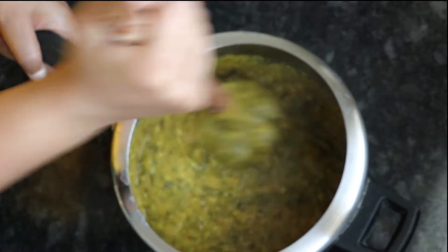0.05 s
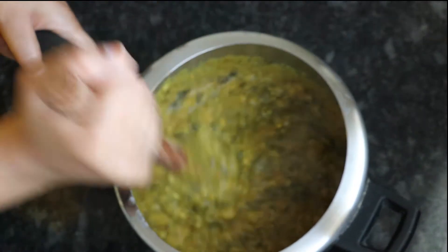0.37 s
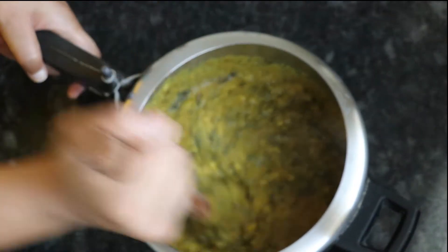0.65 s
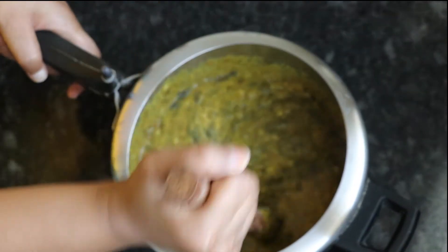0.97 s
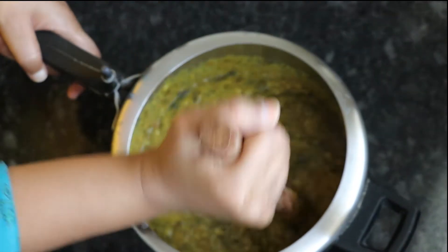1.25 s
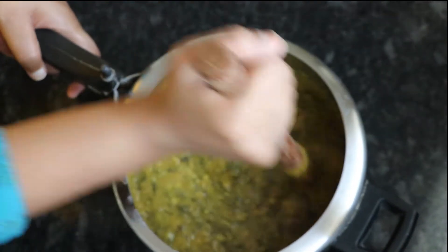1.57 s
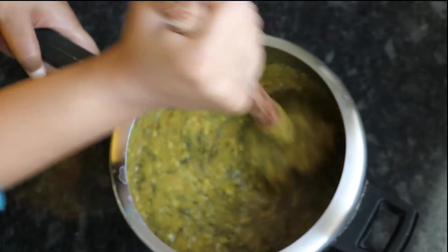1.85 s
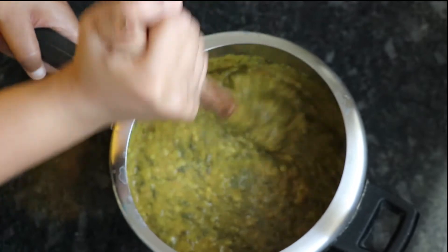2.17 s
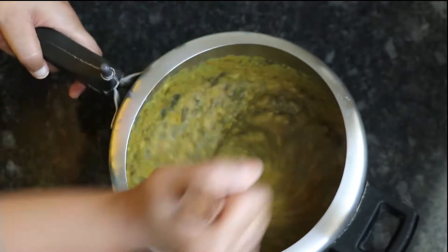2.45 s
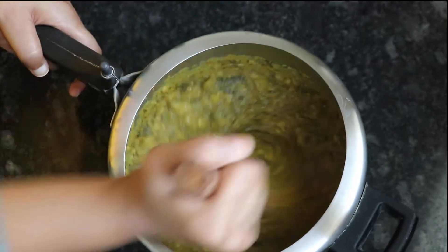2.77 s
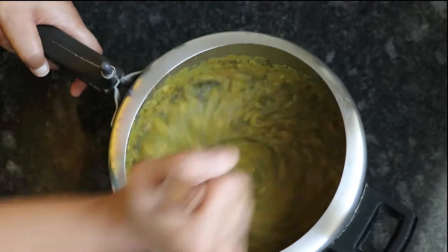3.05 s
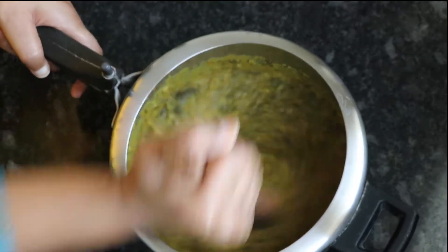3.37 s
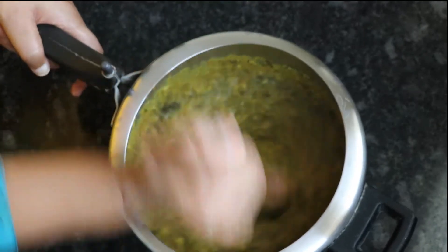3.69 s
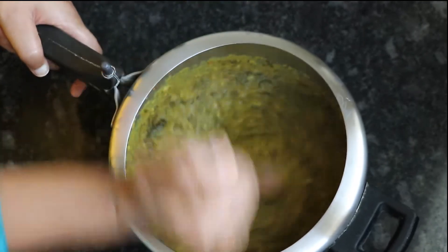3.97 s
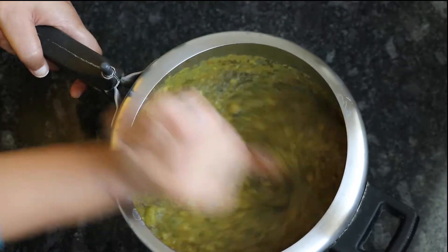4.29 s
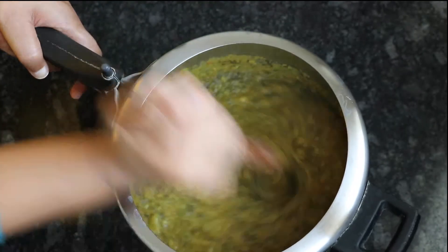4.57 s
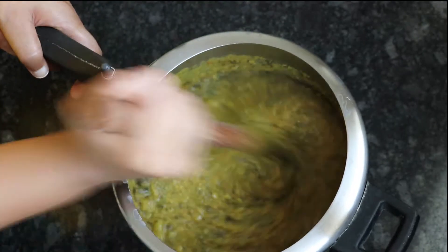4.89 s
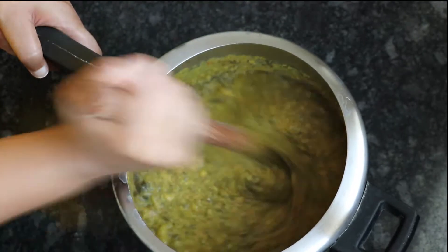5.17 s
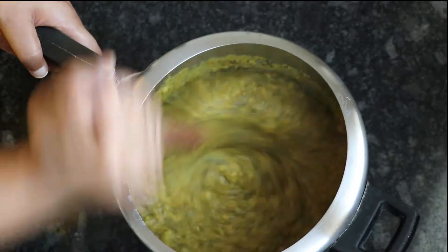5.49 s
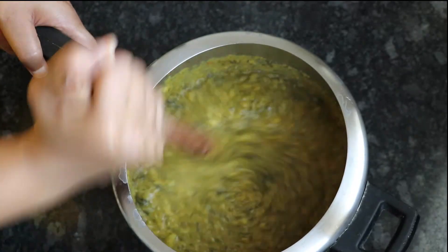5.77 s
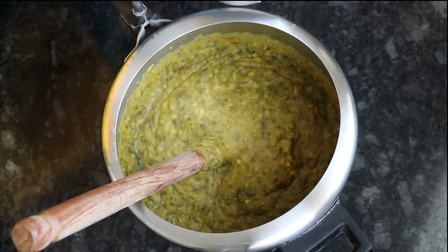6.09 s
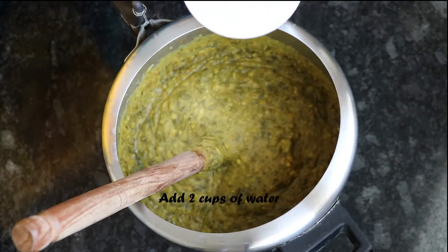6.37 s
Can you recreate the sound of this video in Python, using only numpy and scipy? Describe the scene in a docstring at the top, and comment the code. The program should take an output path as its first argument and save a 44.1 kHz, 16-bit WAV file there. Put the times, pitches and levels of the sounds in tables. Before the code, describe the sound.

From the start, a wooden masher pounds cooked lentils in a steel pressure cooker on a stone counter, close by. Ten firm, even blows fall at about four a second until 2.4 seconds. Each is a thud with a wooden crack, a slight wet splat and a steel ring that lingers briefly in the hard-walled kitchen.

From about 2.7 seconds, much quieter stirring carries on to the end: thick mash churns dully and crackles with tiny air pockets and scattered sticky ticks. Soft, cushioned bumps come around 2.8, 4, 5.4 and 5.6 seconds. Four light, hollow knocks tap the pot's side between 3.5 and 4.4 seconds.

Low room noise and a barely audible, very high appliance whine run underneath, the whine stepping up at 6.1 seconds. Very faint, thin whistles waver around 5.3 seconds and again from 6.1 to 6.4 seconds.

```python
"""A hard-walled kitchen: a wooden masher pounds cooked lentils in a steel pressure cooker on stone.
Ten firm blows reach the bottom and set pot, counter and room ringing. Then the masher stirs: the mash
churns and crackles with bursting air pockets, with soft bumps, sticky ticks and light knocks on the
pot's side. Underneath sit low room noise and a thin appliance whine; faint whistles come near the end."""
import sys
import numpy as np
from scipy import signal
from scipy.io import wavfile

SR = 44100
rng = np.random.default_rng(int(sys.argv[2]) if len(sys.argv) > 2 else 0)


def store_pcm(level_fs):
    """Save levels as 16-bit WAV."""
    pcm = np.round(np.clip(level_fs, -1, 1) * 32767).astype(np.int16)
    wavfile.write(sys.argv[1], SR, np.atleast_2d(pcm).T)


N = 283563
TIME = np.arange(N) / SR


def from_db(db):
    """Decibels to gain."""
    return 10 ** (np.asarray(db) / 20)


def rms_one(x):
    """Scale to unit power."""
    return x / np.sqrt(np.mean(x ** 2) + 1e-20)


def unit_energy(x):
    """Scale to the energy of a unit click."""
    return x / np.sqrt(np.sum(x ** 2, axis=-1, keepdims=True) + 1e-20)


def at_hz(points, hz):
    """Read a curve on a log-frequency axis."""
    points_hz, values = np.transpose(points)
    return np.interp(np.log(hz), np.log(points_hz), values)


def band(x, low_hz, high_hz, order=2):
    """Causal band-pass."""
    sos = signal.butter(order, [low_hz, min(high_hz, SR / 2 - 100)], "band", fs=SR, output="sos")
    return signal.sosfilt(sos, x + 1e-18)


def bands(low_hz, high_hz, count):
    """Adjacent bands as (low, centre, high)."""
    edges = np.geomspace(low_hz, high_hz, count + 1)
    return zip(edges, np.sqrt(edges[:-1] * edges[1:]), edges[1:])


def pan(db):
    """Stereo gains for a level difference, left minus right."""
    return from_db([[db / 2], [-db / 2]])


def drift(rate):
    """Random modulation at unit power, with `rate` turning points a second."""
    knots = rng.standard_normal(int(N / SR * rate) + 2)
    return rms_one(np.interp(TIME * rate, np.arange(len(knots)), knots))


# The room's stereo width. Each row: frequency in Hz, left-right likeness from 0 to 1.
LIKENESS = [(30, 0.51), (120, 0.98), (330, 0.9), (700, 0.56), (1400, 0.22), (2800, 0), (8000, 0)]
# The room's lean to one side. Each row: frequency in Hz, left minus right in dB.
BALANCE = [(100, -3.5), (400, 0.5), (1300, 0.4), (2800, -1.5), (6000, -1.5), (12000, -1.5)]

def spread(pair, hz):
    """Two unrelated signals become left and right: narrow in the bass, wide in the treble."""
    alike = at_hz(LIKENESS, hz)
    mid = np.sqrt((1 + alike) / 2) * pair[0]
    side = np.sqrt((1 - alike) / 2) * pair[1]
    return (mid + side * [[1], [-1]]) * pan(at_hz(BALANCE, hz))


def coloured(noises, spectrum, flicker_db, flicker_rate):
    """Stereo texture at unit power, shaped by an EQ curve, each band flickering by itself."""
    out = 0
    for k, (low, hz, high) in enumerate(bands(spectrum[0][0], spectrum[-1][0], count=13)):
        gain = from_db(at_hz(spectrum, hz) + flicker_db * drift(flicker_rate))
        out = out + gain * spread(band(noises[k % 2], low, high), hz)
    return rms_one(out)


def contacts(hits, crush_s, crush_db, order=3):
    """Each hit (s, dB, low Hz, high Hz) is a click and a brief, uneven crush of lentils in one band."""
    out, t = np.zeros(N + SR), TIME[:SR // 10]
    for s, db, low_hz, high_hz in hits:
        force = from_db(crush_db) * unit_energy(rng.standard_normal(len(t)) * np.exp(-t / crush_s))
        force[0] += 1   # the click
        at = int(s * SR)
        out[at:at + len(t)] += from_db(db) * unit_energy(band(force, low_hz, high_hz, order))
    return out[:N] * np.sqrt(SR / 100)


def ringing(times, levels_db, modes, scatter_db):
    """Every hit strikes each mode with its own strength; high modes reach the two sides out of step."""
    hz, mode_db, t60 = np.transpose(modes)[:, :, None]
    t, out = TIME[:SR], np.zeros((2, N + SR))
    phase = 2 * np.pi * (hz * t + rng.random(hz.shape))
    apart = np.arccos(at_hz(LIKENESS, hz)) * rng.choice([-1, 1], hz.shape)
    envelope = from_db(mode_db - 60 * t / t60) * (1 - np.exp(-hz * t))
    notes = envelope * np.sin([phase, phase + apart])
    strengths = from_db(levels_db[:, None] + scatter_db * rng.standard_normal((len(times), len(modes))))
    for at, strength in zip((times * SR).astype(int), strengths):
        out[:, at:at + SR] += strength @ notes
    return out[:, :N]


# The colour of the room tone. Each row: frequency in Hz, relative level in dB.
ROOM_TONE_EQ = [(15, -45), (25, 4), (161, 1), (206, -1), (301, 6.5), (384, -11.5), (463, -20), (659, -10),
                (1260, -4.5), (1560, -32), (4740, -33.5), (9320, -11), (14800, -31), (16000, -32)]

def room_tone():
    """A steady bed of low noise."""
    noises = rng.standard_normal((2, 2, N))
    return from_db(-51) * coloured(noises, ROOM_TONE_EQ, flicker_db=0.4, flicker_rate=7.3)


def appliance_whine(hz=15625, step_s=6.11):
    """A thin electronic tone on the right that steps up near the end."""
    level_db = np.where(TIME < step_s, -73, -60) + 2 * drift(6)
    return from_db(level_db) * np.sqrt(2) * np.sin(2 * np.pi * hz * TIME) * pan(-17)


# Firm blows on the bottom of the pot. Each row: start in seconds, then the relative levels of
# force, wooden crack and wet splat in dB.
BLOWS = [(0.019, -7.5, -21, -37.5), (0.289, -8, -24.5, -34), (0.556, -7, -21.5, -37.5),
         (0.824, -11, -24.5, -39), (1.07, -7.5, -23.5, -36.5), (1.328, -9, -22.5, -35.5),
         (1.582, -7, -19.5, -30.5), (1.828, -7, -19.5, -39), (2.093, -8, -23, -37.5),
         (2.344, -8, -25.5, -36)]
BARE_CLANG_DB, CUSHIONED_CLANG_DB = -6, -24   # drive to the steel, relative to the force

def firm_blows(thud_hz=392, hz_per_db=6.5):
    """Strokes that reach the bottom; a harder blow is shorter and so thuds higher."""
    mean_db = np.mean([row[1] for row in BLOWS])
    return [(s, db, db + BARE_CLANG_DB, crack_db, splat_db, thud_hz + hz_per_db * (db - mean_db))
            for s, db, crack_db, splat_db in BLOWS]


def masher(strokes):
    """Each stroke (s, force dB, clang dB, crack dB, splat dB, thud Hz) hits pot and mash in the room."""
    times, force_db, clang_db, crack_db, splat_db, thud_hz = np.transpose(strokes)
    thud_hits = zip(times, force_db - 9, thud_hz * 0.67, thud_hz * 1.337)
    thud = contacts(thud_hits, crush_s=0.0028, crush_db=-2, order=2)
    clang_hits = [(s, db - 10.5, 1110, 1380) for s, db in zip(times, clang_db)]
    clang = contacts(clang_hits, crush_s=0.03, crush_db=25)
    # the crack is one sharp swing of pressure where wood meets steel
    crack_hits = [(s, db - 3, 580, 1500) for s, db in zip(times, (crack_db + clang_db) / 2)]
    crack = contacts(crack_hits, crush_s=0.002, crush_db=-6)
    # the wooden stick rings briefly, duller when the blow is soft
    wood_hz = 2550 * from_db(0.097 * (crack_db - crack_db.max()))
    wood_hits = zip(times, crack_db - 4, wood_hz * 0.65, wood_hz * 1.235)
    wood = contacts(wood_hits, crush_s=0.0027, crush_db=10)
    splat_hits = [(s, db - 5.5, 6200, 12500) for s, db in zip(times, splat_db)]
    wet = contacts(splat_hits, crush_s=0.005, crush_db=0, order=2) + sticky_ticks()
    body = thud + pot_ring(times, clang_db)
    direct = body * pan(-1.3) + (clang + crack) * pan(0.5) + wood * pan(-4.5) + wet * pan(-15.5)
    direct[0] = np.roll(direct[0], 1)   # reaches the left one sample later
    impact = thud + clang + crack
    return direct + early_echoes(impact) + kitchen_reverb(impact + wood + wet)


# The low ring of pot, counter and room, then the bright ring of the steel wall.
# Each row: pitch in Hz, relative level in dB, seconds to fall 60 dB.
LOW_MODES = [(78.3, -29.5, 1.04), (117.9, -30.5, 0.57), (161.2, -23.5, 0.62), (198.8, -19, 0.51),
             (213.3, -24.5, 0.57), (259, -24, 1.2), (289, -21, 0.66), (300.6, -13.5, 0.76),
             (330.4, -13.5, 0.97), (402, -36, 0.69), (436, -15, 0.57), (462, -27, 0.95), (525, -17, 0.83),
             (543, -25, 0.93), (566, -29, 1)]
WALL_MODES = [(973, -35, 0.73), (1135, -14, 0.57), (1160, -23.5, 0.96), (1237, -13.5, 0.55),
              (1180, -12.5, 0.57), (1273, -9, .7), (1390, -20, 0.62), (1467, -37, 0.85), (1360, -46, 0.92),
              (1340, -11, 0.44)]

def pot_ring(times, clang_db):
    """Long notes, strong only when a blow gets through the mash to the steel."""
    low = ringing(times, clang_db + 3.5, LOW_MODES, scatter_db=2.5)
    return low + ringing(times, clang_db - 4.5, WALL_MODES, scatter_db=5)


# Early reflections. Each row: delay in seconds, gain in dB.
ECHOES = [(.0085, -8.5), (0.0215, -8.5), (0.051, -14.5)]

def early_echoes(x):
    """The nearest wall and the ceiling throw back distinct echoes."""
    return sum(from_db(db) * np.interp(TIME - delay_s, TIME, x, left=0) for delay_s, db in ECHOES)


# The reverb's colour. Each row: frequency in Hz, gain in dB.
REVERB_EQ = [(70, 2), (120, -1), (170, 6), (300, 1.7), (450, 3.4), (750, 7.7), (950, 6.6), (1280, 7),
             (1650, -1), (2300, 1), (3200, 2), (5000, 3.4), (8500, 8), (11500, 0), (14000, 3)]
# The reverb's tail. Each row: frequency in Hz, seconds to fall 60 dB.
REVERB_T60 = [(100, 0.38), (300, 0.6), (1200, 0.6), (2500, 0.66), (7000, 0.47), (13000, 0.31)]

def kitchen_reverb(x):
    """Dense reflections blur into a wash that stores each band's energy and lets it die away."""
    wash, white = 0, rng.standard_normal((2, 2, N))
    for k, (low, hz, high) in enumerate(bands(70, 16500, count=22)):
        feedback = from_db(-120 / (at_hz(REVERB_T60, hz) * SR))
        energy = signal.lfilter([1 - feedback], [1, -feedback], band(x, low, high, order=3) ** 2 + 1e-18)
        blur = rms_one(band(white[k % 2], low, high, order=3))
        wash = wash + from_db(at_hz(REVERB_EQ, hz)) * np.sqrt(energy) * spread(blur, hz)
    return wash


# The stirring's fader, held at its first value under the blows. Each row: time in seconds, vigour in dB.
VIGOUR = [(2.7, -59.5), (2.95, -56), (3.07, -58), (3.33, -60.5), (3.8, -59.5), (3.97, -58), (4.83, -62.5),
          (6.05, -63), (6.43, -62)]
# The colours of the dull churn and the wet crackle. Each row: frequency in Hz, relative level in dB.
CHURN_EQ = [(100, -7), (170, -3.5), (300, -5), (500, -2), (800, -10), (1300, -11), (2200, -17.5),
            (4000, -21.5)]
CRACKLE_EQ = [(900, 8.5), (1800, -1.5), (3200, 5.5), (5200, -1.5), (8500, 0.5), (12000, -9.5), (15000, -20)]

def stirring(bursts_per_s=3000):
    """Thick mash churns dully while tiny air pockets burst in it; vigour lifts the crackle most."""
    times, levels_db = np.transpose(VIGOUR)
    vigour_db = np.interp(TIME, times, levels_db) - levels_db.mean()
    shape = (2, 2, N)
    churn = coloured(rng.standard_normal(shape), CHURN_EQ, flicker_db=1, flicker_rate=36)
    bursts = rng.random(shape) < bursts_per_s * from_db(2.5 * drift(30)) / SR
    grains = bursts * rng.standard_normal(shape)
    grains *= from_db(1.9 * np.minimum(rng.exponential(1, shape), 4))   # a few pops stand out
    crackle = coloured(grains, CRACKLE_EQ, flicker_db=1, flicker_rate=40)
    return from_db(-48.5 + 0.61 * vigour_db) * churn + from_db(-61.5 + 2.3 * vigour_db) * crackle


# Dull bumps. Each row: start in seconds, force in dB.
BUMPS = [(2.754, -25), (2.914, -37), (4.008, -35.5), (5.366, -38), (5.643, -32)]

def soft_bumps(thud_hz=264, treble_db=-30.5):
    """Strokes cushioned deep in the mash: a low thud with hardly any crack or splat."""
    return [(s, db, db + CUSHIONED_CLANG_DB, db + treble_db, db + treble_db, thud_hz) for s, db in BUMPS]


# The clearest sticky ticks. Each row: start in seconds, relative level in dB.
TICKS = [(2.8052, -43), (3.0714, -45.5), (3.5052, -37.5), (4.011, -42), (4.359, -51), (5.005, -46),
         (5.214, -45), (5.4823, -47)]

def sticky_ticks(faint_count=8, from_s=2.6, to_s=5.6):
    """Mash lets go of the masher with a tick; fainter ones fall at random among the clear ones."""
    faint = list(zip(rng.uniform(from_s, to_s, faint_count), rng.normal(-50.5, 1, faint_count)))
    return contacts([(s, db - 17, 2200, 13000) for s, db in TICKS + faint], crush_s=0.002, crush_db=17)


# Light knocks on the pot's side. Each row: start in seconds, force in dB, relative splat level in dB.
KNOCKS = [(3.51, -23.5, -55), (3.791, -37, -52), (4.087, -26.5, -53.5), (4.374, -24, -35.5)]

def side_knocks(thud_hz=420, crack_db=-15.5):
    """Strokes where the stirring stick taps the side, with little clang."""
    return [(s, db, db + CUSHIONED_CLANG_DB, db + crack_db, splat_db, thud_hz)
            for s, db, splat_db in KNOCKS]


# The pot's hollow side notes. Each row: pitch in Hz, relative level in dB, seconds to fall 60 dB.
SIDE_MODES = [(455, -8, 0.25), (547, -7.5, 0.21), (1870, -10.5, 0.054)]

def side_ring():
    """At each knock the stick snaps brightly on bare steel and the pot rings briefly."""
    times, force_db, _ = np.transpose(KNOCKS)
    snap_hits = [(s, db - 21, 1500, 5500) for s, db in zip(times, force_db)]
    snap = contacts(snap_hits, crush_s=0.002, crush_db=9, order=2)
    return snap * pan(-3) + ringing(times, force_db - 1.5, SIDE_MODES, scatter_db=1)


# Thin whistles. Each row: start and length in seconds, first and last pitch in Hz, level in dB.
WHISTLES = [(5.27, 0.17, 3730, 4300, -70), (5.336, 0.16, 4800, 5500, -69), (6.11, 0.18, 4870, 4900, -70),
            (6.207, .1, 3700, 3370, -66), (6.32, 0.11, 3350, 3450, -69)]

def whistles():
    """Faint, wavering glides that swell and fade."""
    out = np.zeros(N)
    waver = 1 + 0.044 * drift(900)
    flutter = rms_one(from_db(5 * drift(70)))
    for start, length, from_hz, to_hz, db in WHISTLES:
        progress = np.clip((TIME - start) / length, 0, 1)
        hz = (from_hz + (to_hz - from_hz) * progress) * waver
        envelope = from_db(db) * np.sin(np.pi * progress) * flutter
        out += envelope * np.sqrt(2) * np.sin(2 * np.pi * np.cumsum(hz) / SR)
    return out


def scene():
    """The stereo mix of masher, mash and room."""
    strokes = firm_blows() + side_knocks() + soft_bumps()
    return masher(strokes) + stirring() + room_tone() + appliance_whine() + whistles() + side_ring()


def record(dry):
    """Peaks clip at full scale and a steep low-pass cuts the very top."""
    low_pass = signal.cheby2(16, 70, 17100, fs=SR, output="sos")
    return signal.sosfilt(low_pass, np.clip(dry, -1, 1))


dry = scene()
out = record(dry)
store_pcm(out)
```